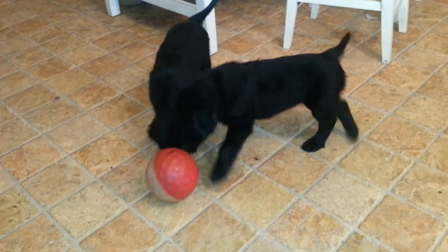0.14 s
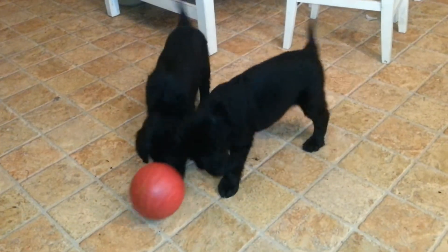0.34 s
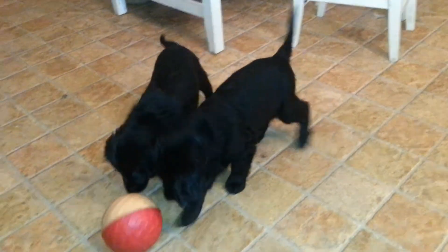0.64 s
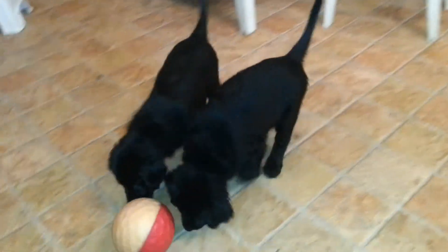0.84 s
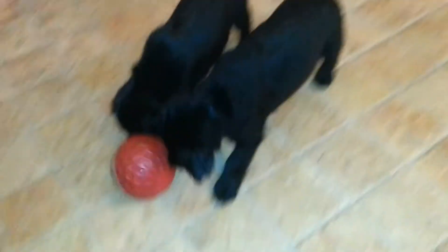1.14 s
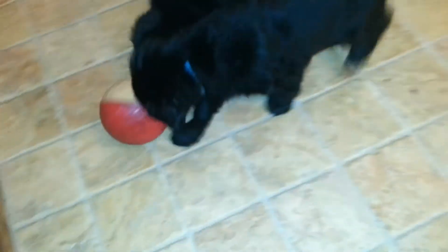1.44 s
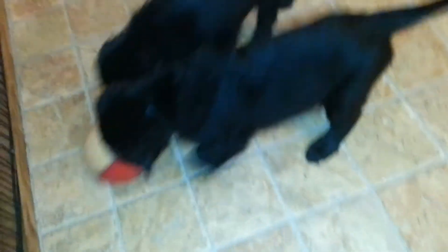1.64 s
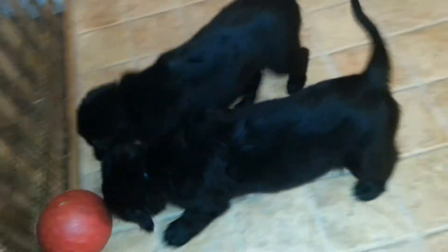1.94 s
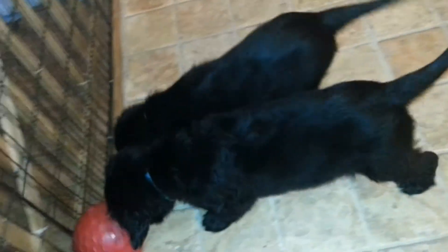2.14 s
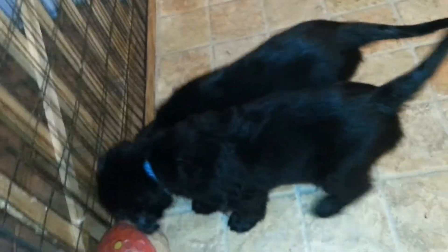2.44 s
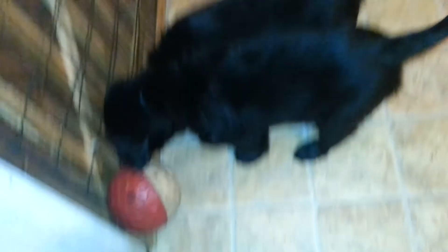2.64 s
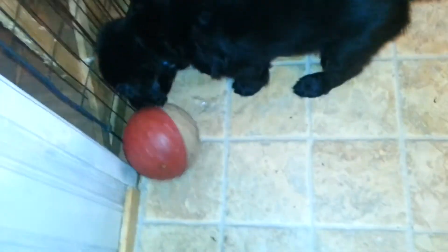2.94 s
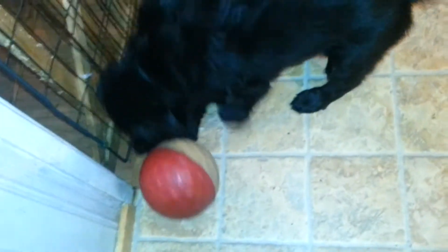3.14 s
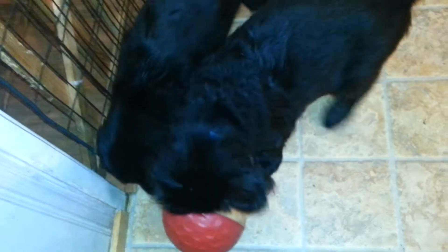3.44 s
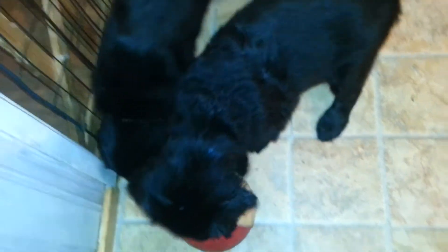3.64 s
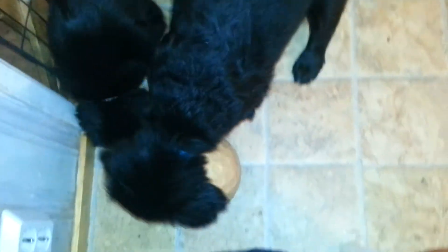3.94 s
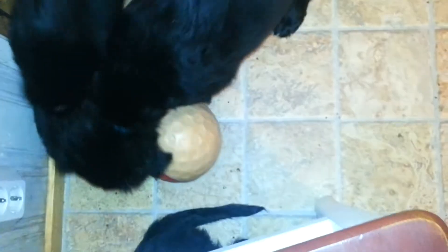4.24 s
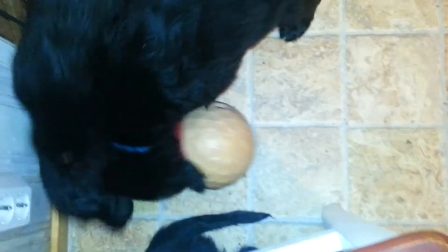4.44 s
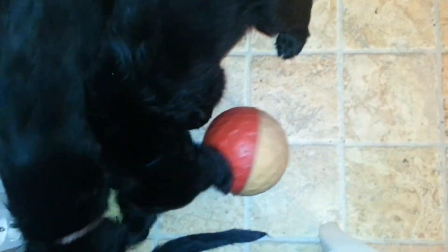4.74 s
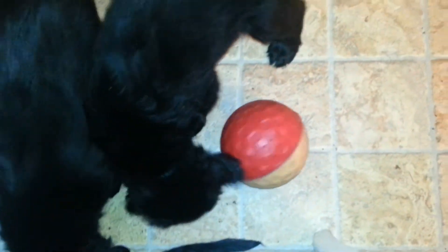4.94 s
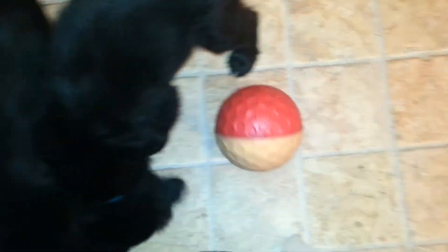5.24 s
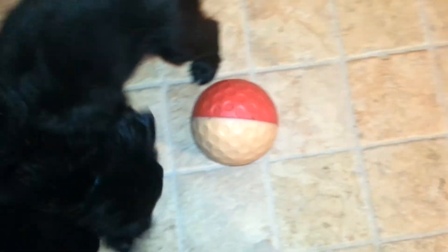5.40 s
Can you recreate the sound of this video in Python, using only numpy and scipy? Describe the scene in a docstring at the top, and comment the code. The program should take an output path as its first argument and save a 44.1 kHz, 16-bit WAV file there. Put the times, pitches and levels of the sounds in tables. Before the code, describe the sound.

From the start, a hard, hollow plastic ball rolls over a tiled kitchen floor with a low, gritty rumble and many small, uneven ticks from its shell. Two puppies follow with soft paw thuds and brief scuffs, growing busier and louder from about 0.9 seconds, with a few claw clicks. At 2 seconds comes the loudest event: the ball bumps a wire gate, whose wooden frame booms and clacks several times in quick succession while the wires snap, jangle and ring. Smaller rattles follow, fading by about 3 seconds. The pups then nudge the ball more quietly, with light rolling, hollow ticks, scattered steps and scuffs. Sharp claw clicks stand out near 2.9, 3.9 and 4.5 seconds. A last cluster of ticks comes around 5 seconds, and soft rolling continues to the end at about 5.6 seconds. Everything sounds close, with a short room echo and faint hiss.

```python
"""Two puppies nose a hard, hollow plastic ball across a tiled kitchen floor.
From the start the ball rumbles, soft paws thud and scuff, and the shell ticks as it turns.
Soon a claw clicks on the tile. After two seconds the ball bumps into a wire gate:
its wooden frame booms and clacks, and its wires snap, jangle and ring.
As the gate dies away, the pups go on nudging the ball about, more quietly."""
import sys
import numpy as np
from scipy import signal
from scipy.io import wavfile

SR = 44100
rng = np.random.default_rng(int(sys.argv[2]) if len(sys.argv) > 2 else 0)


def bounce(signal):
    """Save signal as a 16-bit WAV file at the path given by the first command-line argument."""
    frames = np.transpose(np.atleast_2d(signal))
    limited = np.clip(frames, -1, 1)
    pcm = np.round(limited * 32767).astype(np.int16)
    wavfile.write(sys.argv[1], SR, pcm)


N = 245637
TIME = np.arange(N) / SR

# the ball rolling up to the gate, then nudged about beside it: t/s, rumble level/dB, grit level/dB
ROLL_LEVELS = [
    (0.0, -56.5, -100), (0.264, -64.5, -55.5), (0.402, -58, -51), (0.692, -53.5, -48),
    (0.946, -54.5, -49.5), (1.074, -52, -49), (1.258, -48.5, -47.5), (1.418, -49.5, -50),
    (1.528, -50, -46.5), (1.9, -50, -51),
    (2.65, -54.5, -56.5), (3.04, -50.5, -49), (3.25, -58, -59.5), (3.49, -61.5, -64.5),
    (4.0, -58, -55.5), (4.29, -54.5, -61.5), (4.44, -49, -57.5), (4.53, -54, -68),
    (4.66, -64, -78), (4.95, -59.5, -67), (5.07, -56, -61), (5.57, -60.5, -61.5)]
# the tone colour (how strong each pitch is) of pads or wood rubbing dully: f/Hz, level/dB
RUB_COLOUR = [(80, -40), (150, -16), (300, 1), (500, -3), (800, -5), (1500, -19), (4000, -62)]


def from_db(db):
    """Turn decibels into a number to multiply a sound by."""
    return 10 ** (np.asarray(db) / 20)


def rms_one(x):
    """Scale a signal so that its average strength (rms) is 1."""
    return x / np.sqrt(np.mean(x ** 2) + 1e-20)


def at_hz(points, hz):
    """Look up a pitch in a table, sliding between rows in even musical steps."""
    return np.interp(np.log(hz), np.log(np.array(points)[:, 0]), np.array(points)[:, 1])


def pan(db):
    """Gains for the two ears: positive dB leans left, negative leans right."""
    return rms_one(from_db(np.array([[db], [-db]]) / 2))


def add(out, s, sound):
    """Mix a sound into out, starting at s seconds."""
    i = max(0, round(s * SR))
    out[..., i:i + sound.shape[-1]] += sound[..., :max(0, out.shape[-1] - i)]


def keep_part(x, hz, kind, order=2):
    """Keep the low part, the high part or a band of a sound; a higher order cuts more sharply."""
    sections = signal.butter(order, np.minimum(hz, .45 * SR), kind, fs=SR, output="sos")
    return signal.sosfilt(sections, x + 1e-18)


def wide_noise(colour, size=N, t60=None, balance=None):
    """Stereo noise of a given tone colour; a t60 table (seconds to fade by 60 dB) makes it die away."""
    # how alike the two ears' sound is: f/Hz, likeness (1 = the same)
    likeness = [(100, 0.8), (300, 0.73), (600, 0.42), (1100, 0.26), (2000, -0.22), (5000, 0), (15000, 0)]
    # which way each pitch usually leans: f/Hz, left over right/dB
    usual_balance = [(100, 0), (600, -2.5), (1300, -3), (2400, 2.5), (4300, -7.5), (8000, -2), (14000, -1)]
    edges = np.geomspace(25, 16000, 29)
    white, out, power = rng.standard_normal((2, 2, size)), 0, 0
    for k, (low, high) in enumerate(zip(edges, edges[1:])):
        hz = np.sqrt(low * high)
        mid, side = keep_part(white[k % 2], [low, high], "band")
        alike = np.clip(at_hz(likeness, hz), -1, 1)
        band = np.sqrt(1 + alike) * mid + np.sqrt(1 - alike) * side * [[1], [-1]]
        band = band * from_db(at_hz(colour, hz)) * pan(at_hz(balance or usual_balance, hz))
        power += np.mean(band ** 2)
        fade = 1 if t60 is None else np.exp(-np.log(1000) * TIME[:size] / at_hz(t60, hz))
        out = out + band * fade
    return out / np.sqrt(power)


def struck(modes, t, vary_db, detune, in_step=False):
    """A struck thing rings at its own pitches (modes): one fading tone per row, new for each blow."""
    hz, db, t60 = np.transpose(modes)[:, :, None]
    strength, tuning, side = rng.standard_normal((3, len(modes), 1))
    direction = 1 if in_step else np.sign(side)
    tones = np.sin(2 * np.pi * hz * (1 + detune * tuning) * t)
    return direction * from_db(db + vary_db * strength) * tones * np.exp(-np.log(1000) * t / t60)


def favour(modes, hz, focus_db):
    """Gains that favour the modes near hz, dropping by focus_db for each octave away."""
    return from_db(-focus_db * np.abs(np.log2(np.array(modes)[:, 0] / hz)))


def grains(per_s, spread_db, fall_s):
    """The flickering loudness of many tiny random touches of uneven size."""
    sizes = from_db(spread_db * np.minimum(rng.exponential(1, N), 3.2)) * (rng.random(N) < per_s / SR)
    power = signal.lfilter([1], [1, -np.exp(-2 / (fall_s * SR))], sizes ** 2 + 1e-18)
    return rms_one(np.sqrt(power))


def small_touches(column, over_db, spread_db, count):
    """Uneven times, with levels that follow the ball's rumble (column 1) or grit (column 2)."""
    curve = np.array(ROLL_LEVELS)
    times = (np.arange(count) + rng.random(count)) / count * TIME[-1]
    db = np.interp(times, curve[:, 0], curve[:, column]) + over_db
    return times, db + spread_db * np.clip(rng.standard_normal(count), -2, 1)


def rolling(grit_db=1.5, smooth_db=-5, room_hiss_db=-60, roll_hiss_db=-4.5):
    """The dimpled ball rumbles and grates over the tiles; a faint hiss grows with the rumble."""
    # tone colours of the floor's rumble, the gritty grating and the hiss: f/Hz, level/dB
    rumble_colour = [(30, -36), (75, -20), (110, -6.5), (145, -1), (240, 4), (400, 1.5), (700, -0.5),
                     (1000, -4.5), (1800, -25.5)]
    grit_colour = [(500, -40), (900, -4), (1250, 0), (1900, 3), (2800, -2), (4200, -1), (6000, -7.5),
                   (8000, -17), (12000, -45)]
    hiss_colour = [(30, -3), (150, -32), (1000, 9), (5000, 4), (8000, 4), (11000, 0.5), (15000, -3)]
    s, *levels = np.transpose(ROLL_LEVELS)
    rumble, grit = [from_db(np.interp(TIME, s, db)) for db in levels]
    hiss = np.hypot(from_db(room_hiss_db), from_db(roll_hiss_db) * rumble)
    lumps = rms_one(np.hypot(from_db(smooth_db), grains(per_s=70, spread_db=2.5, fall_s=0.042)))
    rumbling = rumble * wide_noise(rumble_colour) * lumps
    grating = grit * wide_noise(grit_colour) * grains(per_s=410, spread_db=0.5, fall_s=0.0055)
    return rumbling + from_db(grit_db) * grating + hiss * wide_noise(hiss_colour)


def paw_thuds(soft_s=0.0045, focus_db=18, level_db=-3):
    """A soft pad swings the floor a few times, most strongly near the pitch of that step."""
    # the heavy footfalls: t/s, level/dB, f/Hz
    heavy_steps = [(0.002, -42.5, 179), (0.03, -42, 176), (0.565, -39, 240), (0.585, -38, 145),
                   (0.68, -42, 141), (0.738, -38, 255), (0.8, -41.5, 136), (0.908, -34, 170),
                   (0.935, -31, 147), (0.942, -29.5, 215), (1.05, -34.5, 140), (1.123, -25, 146),
                   (1.222, -29.5, 167), (1.305, -49, 151), (1.345, -32, 148), (1.41, -30, 162),
                   (1.495, -24.5, 136), (1.55, -30, 196), (1.59, -30, 127), (1.655, -28.5, 136),
                   (1.715, -38, 144), (1.78, -34, 148), (1.826, -30, 185), (1.895, -33.5, 146),
                   (1.955, -35, 232), (1.98, -30, 237), (2.37, -33, 222), (2.815, -31, 221),
                   (2.885, -30, 214), (2.96, -36, 178), (3.121, -36.5, 202), (3.272, -32.5, 213),
                   (3.751, -39, 265), (4.215, -45.5, 169), (4.471, -36, 152), (4.497, -34.5, 332),
                   (4.781, -44, 213), (5.21, -45, 260), (5.385, -44.5, 210)]
    # the tones of the floor under a paw: f/Hz, level/dB, t60/s
    floor_modes = [(129, -9, 0.15), (145.3, -1, 0.083), (170, -9, 0.12), (216.6, -2, 0.091),
                   (251.5, -5.5, 0.11), (309, 3.5, 0.04), (377, -4.5, 0.057), (548, 2, 0.068)]
    out, t = np.zeros(N), TIME[:SR // 6]
    for s, db, hz in [*heavy_steps, *light_steps()]:
        swing = favour(floor_modes, hz, focus_db) @ struck(floor_modes, t, vary_db=3, detune=0.04)
        swing *= 1 - np.exp(-t / soft_s)
        add(out, s, from_db(db + level_db) * swing / np.abs(swing).max())
    return keep_part(out, 110, "high", order=5) * pan(-1.5)


def light_steps(trot_s=(0.63, 2.3), trot_hz=145, shuffle_hz=253, stray_octaves=0.58):
    """Rows of lighter steps; trotting paws land with full weight and thud deeper than shuffling ones."""
    s, db = small_touches(column=1, over_db=2, spread_db=-3, count=70)
    hz = np.where((trot_s[0] < s) & (s < trot_s[1]), trot_hz, shuffle_hz)
    return np.column_stack([s, db, hz * 2 ** (stray_octaves * rng.standard_normal(len(s)))])


def scuffs(rise_share=0.22):
    """Each slide is a short swell of friction: fur hisses, pads rub dully, an airy swish lies on top."""
    # paws and coats sliding: t/s, hiss level/dB, rub level/dB, swish level/dB, length/s
    slides = [(.003, -49.5, -49, -70, 0.023), (0.565, -45.5, -53, -67, .032), (0.899, -44, -61, -65, 0.086),
              (1.629, -39, -63, -57, 0.013), (1.828, -32.5, -49, -43, 0.0063),
              (1.917, -39.5, -44.5, -60, 0.054), (1.977, -31.5, -37.5, -57, 0.063),
              (3.111, -43.5, -51, -53, 0.029), (3.268, -49, -50, -55.5, 0.037),
              (3.745, -49.5, -48.5, -65, 0.014), (3.962, -51, -54, -55.5, 0.08),
              (4.468, -37, -42, -60, 0.016), (4.487, -42.5, -45.5, -65, 0.04),
              (4.569, -52, -63, -61, 0.023), (5.195, -64, -54, -59, 0.044)]
    # the tone colour of sliding fur: f/Hz, level/dB
    fur_colour = [(300, -12), (800, -11), (1200, -2), (2500, -3), (4500, 3.5), (6500, 2), (10000, -20.5),
                  (15000, -28)]
    effort = np.zeros((3, N))
    for s, hiss_db, rub_db, swish_db, length in slides:
        rise, fall = rise_share * length, (1 - rise_share) * length
        swell = np.minimum(TIME / rise, 1) * np.exp(-np.maximum(TIME - rise, 0) / fall)
        add(effort, s, from_db([[hiss_db], [rub_db], [swish_db]]) * swell)
    hiss, rub, swish = effort
    friction = hiss * wide_noise(fur_colour) + rub * wide_noise(RUB_COLOUR)
    friction *= grains(per_s=3700, spread_db=14, fall_s=0.0041)
    air = rms_one(keep_part(rng.standard_normal((2, N)), [4500, 12500], "band", order=1))
    return friction + swish * air


def faint_ticks(bright_db=-12, knock_hz=1550, stray_octaves=0.2):
    """Rows of small random ticks for ball_ticks, louder the harder the ball grates."""
    s, db = small_touches(column=2, over_db=4, spread_db=-2, count=170)
    bright, pitch = rng.standard_normal((2, len(s)))
    return np.column_stack([s, db, bright_db + 5 * bright, knock_hz * 2 ** (stray_octaves * pitch)])


def ball_ticks(scatter_db=-5.5, scatter_s=0.0043, scratch_db=-10, scratch_s=0.0006, skip_db=-16):
    """A sharp touch on the tile rings the ball's shell briefly; some ticks are dull, some bright."""
    # the clear ticks: t/s, level/dB, click over knock/dB, knock f/Hz
    clear_ticks = [(0.1916, -47.5, -21, 1500.0), (0.2348, -47.5, 2, 1910), (0.2769, -35.0, -11, 1510),
                   (0.3139, -38.5, -17, 1420.0), (0.3534, -49.5, 10, 1980.0), (0.4137, -53, 8, 1310.0),
                   (0.4799, -44, 3, 1820), (0.4993, -38.5, -2.0, 1780.0), (0.5174, -32, -3.5, 1750),
                   (0.6024, -40, 5.5, 1830), (0.6273, -40, 7.5, 1800), (0.652, -41, -12, 1600),
                   (0.7149, -31.0, -3, 1720), (0.7572, -46.5, 8.5, 1670.0), (0.7615, -43, -12, 1600),
                   (0.8025, -35.0, -4.5, 2210), (0.8538, -31.5, -5, 1980), (0.861, -34.5, -12.0, 1730),
                   (0.9462, -34, -10, 1860), (0.9677, -38.5, 6.5, 1910), (1.006, -34, -3.5, 1890),
                   (1.045, -38, -2, 1760), (1.0591, -38, 13, 1920.0), (1.0743, -34.0, -2, 1600),
                   (1.124, -29, -1, 1670), (1.1515, -34.0, -0.5, 1870), (1.1728, -42, 1.5, 1680),
                   (1.4279, -37.5, -7.0, 1510.0), (1.4971, -34.5, 0.5, 1910), (1.5042, -27, -7, 1840.0),
                   (1.5108, -29.5, -4.5, 1840), (1.5155, -33, -18, 1400), (1.561, -34.5, -10, 1680),
                   (1.5751, -46.5, 16, 2350.0), (1.6747, -32.5, -16, 1880), (1.6911, -31, 3, 1830.0),
                   (1.7235, -36.5, -11, 1400), (1.7912, -37, -20, 1430), (1.8245, -32.5, 0, 1860),
                   (1.8285, -27, -2.5, 1350), (1.9075, -39, -3, 1880), (1.9213, -36, 0.5, 1950),
                   (1.9263, -35, -7, 1950.0), (1.9311, -34, -13, 2050), (1.9695, -33.5, -7.0, 2020),
                   (2.8338, -38, -4, 1660.0), (2.9828, -41.5, 1.0, 1730), (2.9902, -43.5, 5, 2100.0),
                   (3.1619, -40, -10, 1760), (3.1846, -46.5, -15, 1620.0), (3.4545, -49.5, -9.0, 1450.0),
                   (3.5301, -43, -20.0, 1350.0), (3.5365, -41.5, 1.5, 1600), (3.5686, -46.5, -16, 1420),
                   (3.67, -40.0, 2.0, 1560), (3.6815, -44, -1, 1600), (3.7538, -46, -5, 1460),
                   (3.8663, -47, -22, 1360), (3.8841, -47, -16, 1500.0), (4.0983, -36.5, -14, 1330),
                   (4.1091, -36.5, -9, 1430), (4.1505, -52, -15, 1350), (4.1716, -54, -8.0, 1510.0),
                   (4.2111, -32, -13.5, 1840), (4.2603, -39.5, -21, 1590.0), (4.3, -34.0, -3.5, 1780),
                   (4.418, -48, -19, 1400), (4.632, -56, -12, 1400), (4.9344, -44.5, -27.5, 1530.0),
                   (4.9737, -40.5, -15.0, 1570), (4.9993, -41.5, -21.0, 1560.0),
                   (5.0191, -40.5, -5.5, 1870.0), (5.0527, -40, -7, 1880), (5.0977, -46, -19, 1850),
                   (5.1248, -34.5, -10, 1940), (5.1562, -44, -13.0, 1690.0), (5.1921, -47.5, -19, 1320),
                   (5.2221, -47, -3, 1570), (5.536, -36.0, -15, 1700)]
    # the tones of the hollow shell: f/Hz, level/dB, t60/s
    shell_modes = [(1280, -2, 0.013), (1540, 2.5, 0.0059), (2075, 3.5, 0.005), (2540, 8.5, 0.002),
                   (3370, -3.5, 0.0031), (4036, 4, 0.0045), (4680, -6.5, 0.0017), (5500, -10.5, 0.0045),
                   (6500, -28, 0.0021)]
    out, t = np.zeros((2, N)), TIME[:SR // 25]
    upper, attack = np.array(shell_modes)[:, 0] > 2800, SR // 250
    scatter_fade = np.exp(-t / scatter_s) * np.sqrt(2 / (scatter_s * SR))
    scratch_fade = np.exp(-t / scratch_s) * np.sqrt(2 / (scratch_s * SR))
    for s, db, bright_db, knock_hz in [*clear_ticks, *faint_ticks()]:
        tones = struck(shell_modes, t, vary_db=2.5, detune=0.05, in_step=True)
        # the low tones make a hollow knock, the high ones a click
        low_tones = (favour(shell_modes, knock_hz, focus_db=12) * ~upper) @ tones
        knock_band = [np.clip(0.65 * knock_hz, 1090, 1400), max(1500, 1.53 * knock_hz)]
        knock = keep_part(low_tones, knock_band, "band", order=4)
        click = keep_part(upper @ tones, [2300, 7800], "band", order=3)
        # floor, legs and furniture scatter the tick differently to each ear
        paths = from_db(scatter_db) * rng.standard_normal((2, len(t))) * scatter_fade
        # the dimples catch on the tile, so each touch is a tiny scratch
        contact = from_db(scratch_db) * rng.standard_normal(len(t)) * scratch_fade
        contact[0] += 1
        add(paths[0], 0.00007, contact)  # the left ear hears it slightly later
        add(paths[1], 0, contact)
        # the shell skips and touches again a moment later
        add(paths, rng.uniform(0.004, 0.0097), from_db(skip_db + 1.9 * rng.standard_normal()) * paths)
        for part, gain_db, side_db in ((knock, 0, -3), (click, bright_db, -7.5)):
            ring = signal.fftconvolve(part[None], paths, axes=1)
            ring /= np.sqrt(np.mean(ring[:, :attack] ** 2))
            add(out, s, from_db(db + gain_db) * pan(side_db) * ring)
    return out


def claw_clicks(low_hz=2200, top_hz=9500, level_db=1):
    """A hard claw tip on hard tile gives one tiny bright pulse."""
    # claws landing: t/s, level/dB, left over right/dB
    clicks = [(0.79, -38, 4), (1.2005, -42, -9), (1.277, -33, -8), (2.728, -33, 20), (2.9123, -29.5, -15),
              (3.879, -39, 18), (3.8943, -28.5, 18), (3.9269, -27.5, -17), (4.4018, -33.5, -9),
              (4.472, -24.5, -19)]
    out, touch = np.zeros((2, N)), np.zeros(SR // 200)
    touch[0] = 1
    snap = keep_part(keep_part(touch, low_hz, "high"), top_hz, "low")
    for s, db, side_db in clicks:
        add(out, s, from_db(db + level_db) * snap / np.abs(snap).max() * pan(side_db))
    return out


def gate(thump_s=0.0077, hum_db=-17, wood_s=0.075, clack_s=0.0068, chatter_s=0.072, ring_t60=0.91):
    """Each blow booms in the frame, clacks, and leaves the wire mesh ringing and chattering."""
    # blows on the gate: t/s, frame level/dB, boom f/Hz, clack level/dB, wire level/dB
    blows = [(2.006, -17, 236, -18.5, -35.5), (2.03, -24.5, 402, -35, -51), (2.037, -20.5, 142, -38, -57),
             (2.0698, -19.5, 478, -19, -27.5), (2.0854, -23, 201, -14.5, -22), (2.098, -30, 240, -31, -26),
             (2.117, -17.5, 276, -27, -25.5), (2.166, -31, 230, -24, -33.5), (2.21, -36, 262, -28, -40),
             (2.2456, -48, 200, -24.5, -35), (2.258, -62, 600, -21.5, -31.5), (2.307, -63, 600, -32, -35),
             (2.363, -60, 496, -36, -36), (2.503, -47, 260, -31, -38), (2.658, -50, 224, -41, -40.5),
             (2.728, -67, 300, -42, -44), (2.766, -66, 298, -32, -43.5)]
    # the tones of the wooden frame and of single wires: f/Hz, level/dB, t60/s
    frame_modes = [(129, -6, 0.19), (148.4, -2.5, 0.2), (169, -5, 0.2), (206.5, -1, 0.36), (232, -2, 0.39),
                   (276.5, 0.5, 0.37), (309, -5.5, 0.27), (382, -1, 0.25), (456, -0.5, 0.26),
                   (572, -2, 0.13), (632, 4.5, 0.16), (712, 1, 0.38), (810, 6, 0.16), (920, 8, 0.1),
                   (1130, 7, 0.25)]
    wire_modes = [(1285, 4, 0.8), (1905, 3, 1.6), (1987, 6, 0.8), (2090, 7, 0.8), (2112, 7, 0.7),
                  (2377, 4, 1.0), (2865, 3, 0.9), (2980, 6, 0.9), (3035, 4, 0.6), (4010, 6, 0.6),
                  (4113, 8, 0.65), (4256, 6, 0.8), (4350, 8, 0.55), (4592, 5, 0.85), (4729, 9, 0.5),
                  (5062, 3, 0.6), (6918, -4, 1.2)]
    # tone colours of the mesh and the clack: f/Hz, level/dB
    wire_colour = [(200, -31), (500, -9), (1100, -1), (1500, -3), (2050, -0.5), (2500, 4), (2950, 1.5),
                   (3500, -2), (4400, -1), (6000, -6), (8500, -11.5), (11000, -15), (15000, -35)]
    clack_colour = [(80, -39), (200, -14), (500, -27), (1200, 7), (2500, 6.5), (4600, 9), (7000, -11),
                    (10000, -14), (15000, -28)]
    # which way the gate's sound leans: f/Hz, left over right/dB
    sides = [(100, -1), (600, 0.5), (1300, -4), (2400, 2), (4300, -7.5), (8000, -7), (14000, -31)]
    frame, clack, shake, knock, shimmer = np.zeros((5, N))
    mesh, t = np.zeros((2, N)), TIME[:SR]
    # loose joints soak up most of a thump at once; a weaker hum rings on
    joints = (np.exp(-t / thump_s) + from_db(hum_db)) * (1 - np.exp(-t / 0.0043))
    for s, frame_db, boom_hz, clack_db, wire_db in blows:
        singing = np.array([struck(wire_modes, t, vary_db=2.5, detune=0.0006).sum(0) for ear in mesh])
        frame_tones = struck(frame_modes, t, vary_db=1.5, detune=0.008)
        boom = joints * (favour(frame_modes, boom_hz, focus_db=14) @ frame_tones)
        add(frame, s, from_db(frame_db - 6.5) * boom / np.std(boom[:SR // 50]))
        add(mesh, s, from_db(wire_db - 29) * singing * pan(-17))
        # fading loudness curves for the noises below; the squared ones add up as power
        add(knock, s, (from_db(frame_db - 14) * np.exp(-t / wood_s)) ** 2)
        add(clack, s, from_db(clack_db) * np.exp(-t / clack_s))
        add(shake, s, (from_db(wire_db) * np.exp(-t / chatter_s)) ** 2)
        add(shimmer, s, from_db(wire_db - 2 - 60 * t / ring_t60) ** 2)
    # countless close wire tones blur into a shimmer
    blur = keep_part(wide_noise(wire_colour, balance=sides), [500, 9000], "band", order=1)
    mesh += np.sqrt(shimmer) * blur
    # crossing wires buzz finely, and now and then snap hard against each other
    buzz = from_db(-5.5) * grains(per_s=280, spread_db=4, fall_s=0.0062)
    snaps = from_db(-6) * grains(per_s=75, spread_db=3, fall_s=0.0032)
    chatter = np.sqrt(shake) * np.hypot(buzz, snaps) * wide_noise(wire_colour, balance=sides)
    # the wooden panels rattle against each other
    rattle = np.sqrt(knock) * grains(per_s=260, spread_db=-2.5, fall_s=0.0031) * wide_noise(RUB_COLOUR)
    wood = frame * pan(-2.3) + rattle + clack * wide_noise(clack_colour, balance=sides)
    wood = keep_part(wood, 123, "high", order=3)  # an open frame gives off almost no deep bass
    return wood + mesh + chatter + wire_jangles(shake, start_s=blows[0][0])


def wire_snaps(fall_s=0.0019, band_hz=(3200, 7000)):
    """A loose wire whips back against its neighbour: a brief, bright crack."""
    # wires snapping back as the gate shakes: t/s, level/dB
    snaps = [(2.006, -20), (2.088, -19), (2.1332, -20), (2.177, -24), (2.2465, -23), (2.273, -32),
             (2.3653, -27), (2.7264, -49)]
    force = np.zeros(N)
    for s, db in snaps:
        add(force, s, from_db(db) * np.exp(-TIME[:SR // 20] / fall_s))
    return force * rms_one(keep_part(rng.standard_normal((2, N)), band_hz, "band")) * pan(-6)


def wire_jangles(shake, start_s, length_s=0.85, low_hz=1900, top_hz=7500, ring_t60=0.047, count=70):
    """Wires tap one another at random while the gate shakes; each tap rings on five random pitches."""
    out, t = np.zeros((2, N)), TIME[:SR // 8]
    for s in start_s + (np.arange(count) + rng.random(count)) / count * length_s:
        octaves = rng.random(5) * np.log2(top_hz / low_hz)
        modes = [(low_hz * 2 ** up, -4 * up, ring_t60) for up in octaves]  # higher tones are weaker
        tap = np.array([struck(modes, t, vary_db=3, detune=0).sum(0) for ear in out])
        strength = from_db(-1 + 3 * rng.uniform(-2, 1)) * np.sqrt(shake[round(s * SR)])
        add(out, s, strength * tap * pan(-4))
    return out


def kitchen(x, echo_db, build_s=0.0029):
    """Hard walls answer a sound with a short, dense wash of echoes."""
    # how long the room rings: f/Hz, t60/s
    ring_times = [(100, 0.23), (300, 0.33), (1500, 0.37), (4000, 0.29), (12000, 0.29)]
    flat = [(100, 0), (15000, 0)]
    tail = wide_noise(flat, size=SR // 2, t60=ring_times, balance=flat)
    tail *= 1 - np.exp(-TIME[:SR // 2] / build_s)
    tail /= np.sqrt(np.sum(tail ** 2) / 2)
    return x + from_db(echo_db) * signal.fftconvolve(x, tail, axes=1)[:, :N]


def scene():
    """Mix the sharp and the soft sounds, each with its echo, then add the gate and the rolling."""
    sharp = kitchen(ball_ticks() + claw_clicks() + wire_snaps(), echo_db=-8.5)
    soft = kitchen(paw_thuds() + scuffs(), echo_db=-5.5)
    return sharp + soft + gate() + rolling()


def record(dry):
    """Cut away the highest treble steeply, above 14700 Hz."""
    return signal.sosfilt(signal.ellip(12, .1, 90, 14700, fs=SR, output="sos"), dry)


dry = scene()
out = record(dry)
bounce(out)
```